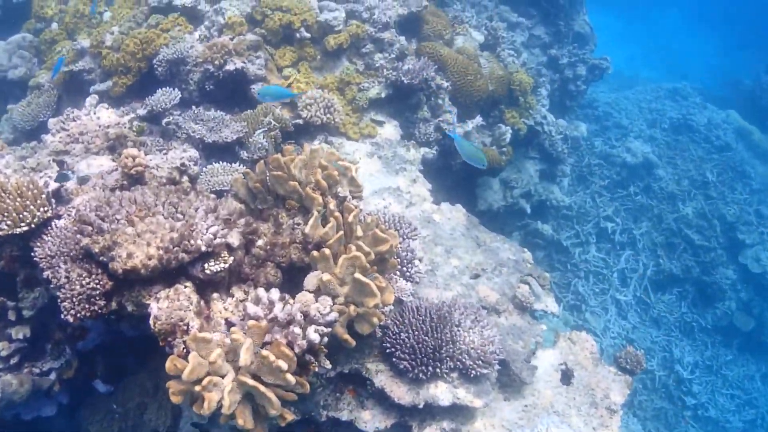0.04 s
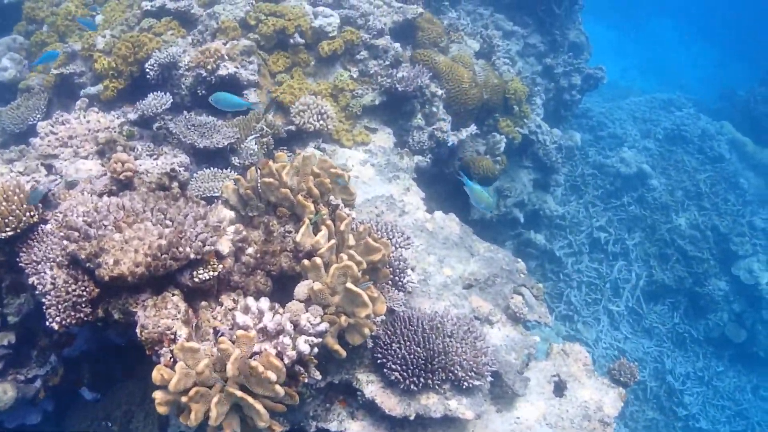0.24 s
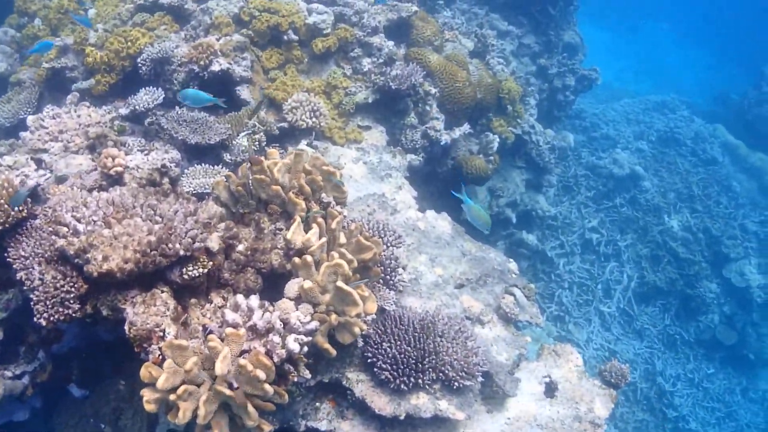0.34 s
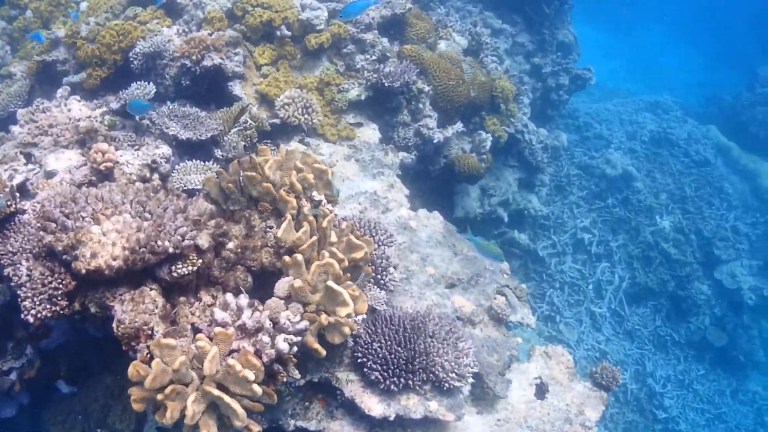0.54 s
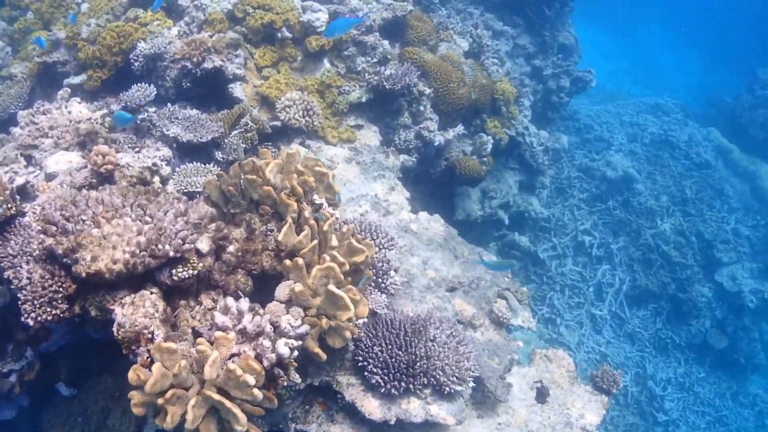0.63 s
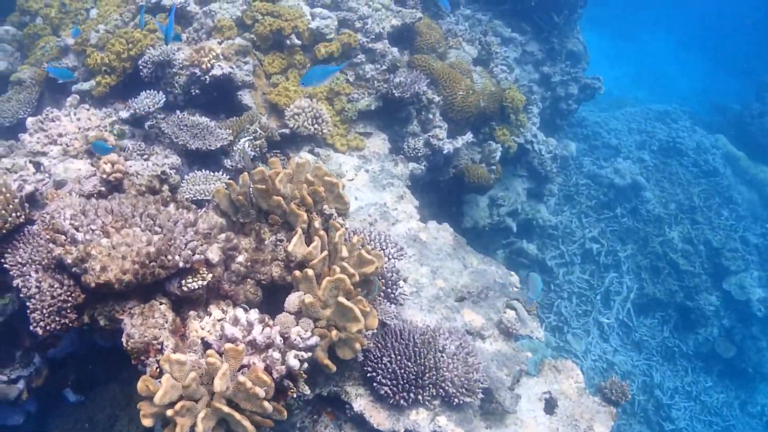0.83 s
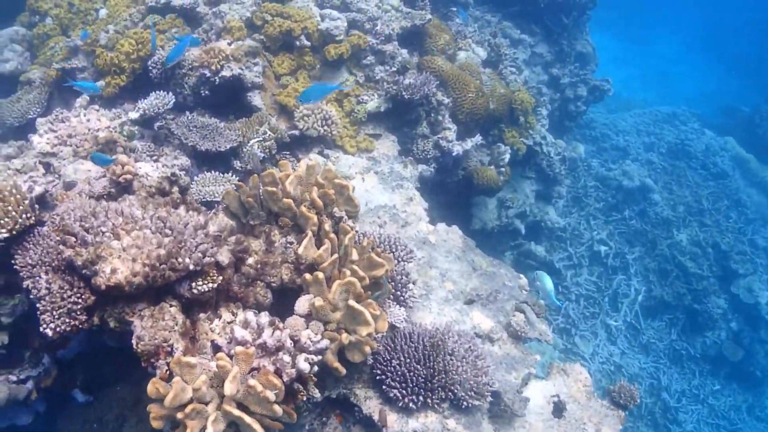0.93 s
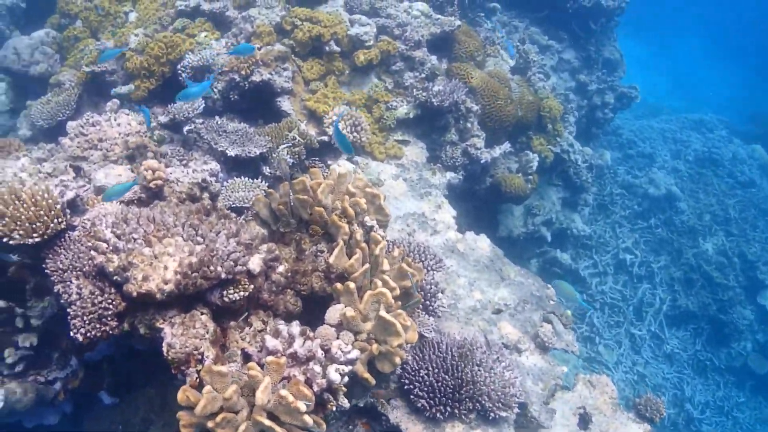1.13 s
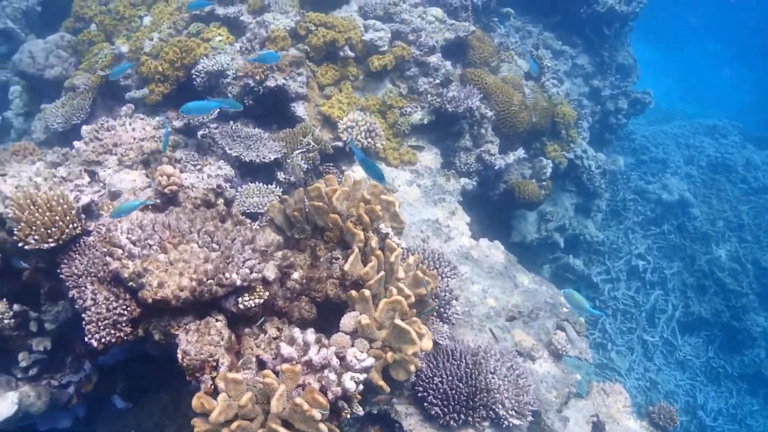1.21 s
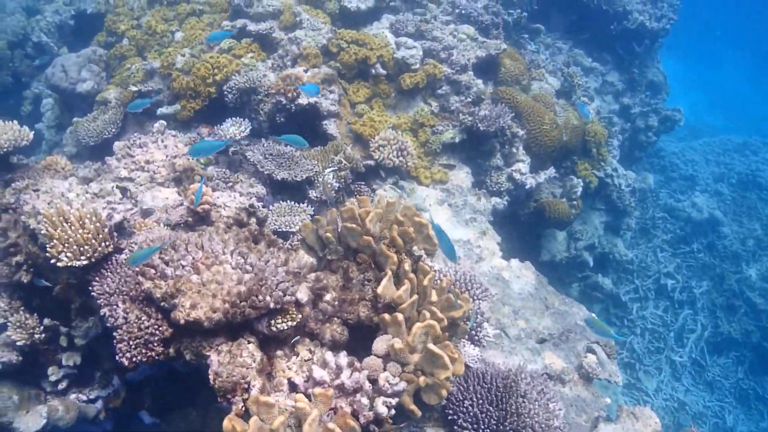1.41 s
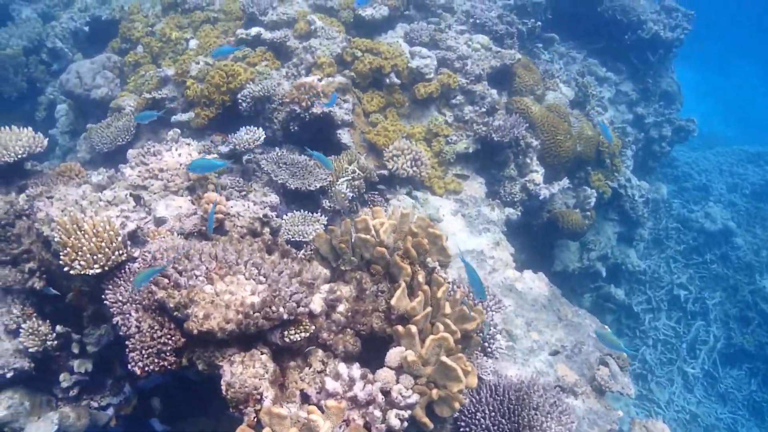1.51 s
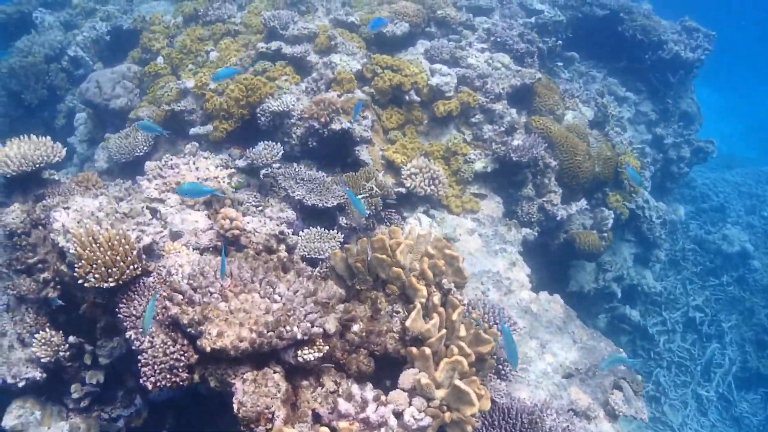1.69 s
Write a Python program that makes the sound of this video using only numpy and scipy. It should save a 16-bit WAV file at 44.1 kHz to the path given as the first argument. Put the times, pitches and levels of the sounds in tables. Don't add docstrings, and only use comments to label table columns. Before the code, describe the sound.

Water knocks and gurgles hollowly against a sealed underwater camera housing, with faint reef crackle behind.

```python
import sys
import numpy as np
from scipy import signal
from scipy.fft import rfft, irfft
from scipy.io import wavfile
from scipy.ndimage import uniform_filter1d

SR = 44100
rng = np.random.default_rng(int(sys.argv[2]) if len(sys.argv) > 2 else 0)


def bounce(signal):
    frames = np.transpose(np.atleast_2d(signal))
    limited = np.clip(frames, -1, 1)
    pcm = np.round(limited * 32767).astype(np.int16)
    wavfile.write(sys.argv[1], SR, pcm)


def gain_from_db(level_db):
    decades = np.asarray(level_db, float) / 20
    return 10 ** decades


N = 77175


def ring(hz, tau_s, sag=0., order=1):
    tau_s = max(tau_s, 1e-4)
    t = np.arange(int(14 * tau_s * SR)) / SR
    envelope = (t / tau_s / order) ** order * np.exp(order - t / tau_s)
    return envelope * np.sin(2 * np.pi * hz * (t - sag * t ** 2 / (8 * tau_s)))


def add(out, wave, start_s):
    i = max(int(start_s * SR), 0)
    out[:, i:i + wave.shape[-1]] += wave[..., :N - i]


def follow(points):
    return np.interp(np.arange(N) / SR, *np.array(points).T)


def colour(x, points, extra=0.):
    hz = np.fft.rfftfreq(N, 1 / SR) + 1
    curve_hz, curve_db = np.array(points).T
    gain = gain_from_db(np.interp(np.log(hz), np.log(curve_hz), curve_db)) + extra
    return irfft(rfft(x) * gain, N)


def unit(x):
    return x / np.sqrt(np.mean(x ** 2))


def walk(rate_hz):
    hold = int(SR / rate_hz)
    steps = np.repeat(rng.standard_normal(N // hold + 1), hold)
    return 1.45 * uniform_filter1d(uniform_filter1d(steps, hold), hold)[:N]


def dust(rate_hz, scatter_db):
    when, sign, size = rng.random((3, N))
    return (when < rate_hz / SR) * np.sign(sign - .5) * gain_from_db(-scatter_db * np.log(size + 1e-4))


# (time [s], peak [dB], pitch [Hz], ring time constant [s])
KNOCKS = [(.004, -25.5, 358, 0.0028), (0.041, -21.5, 384.8, 0.0034), (0.076, -25.5, 370, 0.0031),
          (0.141, -27.5, 375, .004), (0.168, -23.5, 370, 0.0048), (0.202, -19, 392, 0.0031),
          (0.233, -19, 362, 0.0016), (0.251, -16, 374, 0.0034), (.272, -18.5, 388, 0.0014),
          (0.283, -19, 336, 0.0031), (0.338, -20.5, 338.6, 0.002), (0.353, -18.5, 350, 0.0022),
          (0.377, -24, 352, 0.006), (.394, -23.5, 364.4, 0.0042), (0.407, -18, 339, 0.002),
          (.444, -20.5, 364, 0.0018), (0.48, -19.5, 351, 0.002), (0.505, -18.5, 419.6, 0.0037),
          (0.539, -10.5, 375, 0.002), (0.55, -22.5, 394, 0.0037), (0.59, 0, 389, 0.0017),
          (.652, -24.5, 346, 0.0013), (.68, -30, 433, 0.0037), (0.752, -19.5, 377, 0.0019),
          (0.795, -29, 352, 0.0013), (.807, -29, 375, 0.005), (0.834, -26, 395, 0.0039),
          (0.856, -22, 426, 0.0018), (0.877, -25.5, 347, 0.0049), (0.914, -24, 351, 0.0037),
          (0.959, -25, 377, 0.0035), (0.998, -23, 353, 0.002), (1.06, -25.5, 353, 0.0012),
          (1.083, -29.5, 347, 0.0047), (1.148, -21.5, 409.5, 0.0047), (1.179, -18, 405, 0.0024),
          (1.246, -22, 355, 0.0019), (1.258, -25.5, 362, 0.0018), (1.274, -23, 351, 0.0037),
          (1.295, -26.5, 340, 0.0046), (1.34, -36, 344, 0.0028), (1.412, -27, 363, 0.0045),
          (1.47, -14, 324, 0.0019), (1.501, -28, 383, 0.0074), (1.53, -30.5, 385, 0.0013),
          (1.609, -27, 353, 0.0023), (1.633, -29, 332, 0.0018), (1.687, -24, 378, 0.0025),
          (1.701, -27, 362, 0.0021), (1.73, -28, 348, 0.0027)]
# (time [s], level [dB])
FLOW = [
    (0.0, -38.5),
    (0.326, -35.5),
    (.7, -37),
    (1.238, -40.5),
    (1.75, -36),
]
# (frequency [Hz], gain [dB])
SHELL_SKIRTS = [(60, -60.5), (150, -20), (260, -16), (550, -19.5), (850, -17.5), (1200, -39), (2500, -40),
                (6500, -96)]


def shell():
    hz = np.fft.rfftfreq(N, 1 / SR) + 1
    mode_hz, width_hz, peak_db = 364, 93, -1.5
    mode = gain_from_db(peak_db) / (1 + ((hz - mode_hz) / (width_hz / 2)) ** 2)
    push = dust(900, scatter_db=2) * gain_from_db(1.0 * walk(23.5))
    left = (unit(colour(push, SHELL_SKIRTS, mode)) * gain_from_db(follow(FLOW) + 3))[None]
    upper_hz, upper_db, upper_s = 538.6, -11.5, 0.0016
    for s, db, pitch_hz, tau_s in KNOCKS:
        add(left, gain_from_db(db - 1.6) * ring(pitch_hz, tau_s, sag=0.032, order=3), s - .0016)
        add(left, gain_from_db(db + upper_db) * ring(upper_hz, upper_s, order=2), s)
    right_lag_s = .0001
    right = irfft(rfft(left[0]) * np.exp(-2j * np.pi * hz * right_lag_s), N)
    return np.array([left[0], right])


# (time [s], peak [dB], pitch [Hz], length [s])
THUMPS = [(.45, -48, 131, 0.0063), (0.625, -50, 75, 0.0045), (.7, -75, 85.5, 0.0034),
          (0.817, -55, 114, 0.007), (0.9, -47, 71, 0.0051), (1.03, -35.5, 123, 0.0042),
          (1.082, -31.5, 85, 0.0032), (1.143, -42.5, 75, 0.0057), (1.192, -34.5, 123, 0.0044),
          (1.222, -37.5, 107, 0.0048), (1.308, -37, 95, 0.0048), (1.339, -44, 75, 0.0055),
          (1.38, -49, 70, 0.0061), (1.6, -46.5, 176, 0.0082), (1.672, -43, 134, 0.004)]
# (time [s], peak [dB], pitch [Hz], ring time constant [s], left share
# [dB])
PINGS = [(.118, -28.5, 375, 0.0055, 1.5), (.282, -22, 577, 0.0016, -0.5), (0.396, -57, 1640, .0008, 18.5),
         (0.447, -33.5, 237, 0.003, 1), (.483, -25.5, 1090, 0.0013, -18), (0.498, -27.5, 1170, 0.0015, -35),
         (0.521, -26.5, 1292, 0.002, -24), (.529, -16.5, 387, .004, 1.5), (.541, -17.5, 588, 0.0011, 0.5),
         (0.541, -27, 1080, 0.00072, -15), (.655, -39, 149, 0.0049, -5.5),
         (0.721, -33.5, 1180, 0.0015, -24), (0.753, -24, 594, 0.0017, 0), (.752, -30.5, 1080, 0.0012, -17),
         (.855, -27.5, 1306, 0.0027, -29), (1.0, -33, 776, 0.0028, -10), (1.285, -34.5, 870, 0.0029, -17),
         (1.203, -35.5, 1630, .001, -10), (1.325, -30.5, 576, 0.0022, -1), (1.469, -26, 190, 0.003, -0.5),
         (1.529, -33, 1080, 0.0031, -20), (1.556, -36.5, 956, 0.0014, -17), (1.59, -31, 860, 0.0024, -17)]
# (time [s], level [dB])
EDDY = [(0, -4), (.13, 0), (.45, 2.5), (.65, 4), (.8, -1), (1.05, -5.5), (1.25, 1), (1.35, -3), (1.5, 1.5),
        (1.6, -0.5), (1.75, 2)]
# (frequency [Hz], gain [dB])
PORT_CURVE = [(60, -31), (200, -24), (600, -22), (1000, -19), (1400, -26.5), (1800, -35.5), (2300, -63),
              (6500, -89.5)]


def port():
    out = np.zeros((2, N))
    rub = dust(1500, scatter_db=1.15) * gain_from_db(3 * walk(17.98))
    out[1] = unit(colour(rub, PORT_CURVE)) * gain_from_db(-39 + follow(EDDY))
    thump_side_db = np.array([[-28], [6]])
    for s, db, pitch_hz, tau_s in THUMPS:
        add(out, gain_from_db(db + thump_side_db) * ring(pitch_hz, tau_s, order=2), s - tau_s)
    for s, db, pitch_hz, tau_s, left_db in PINGS:
        ping_side_db = np.array([[left_db], [0]])
        add(out, gain_from_db(db + ping_side_db) * ring(pitch_hz, tau_s, order=2), s - .001)
    return out


# (frequency [Hz], left [dB], right [dB], ring time constant [s])
SNAP_MODES = [(1682, -15, -6, 0.0014), (2759.4, -11.5, 2.5, 0.00032), (3129, -4.5, 3.5, 0.00038),
              (3453, -15.5, -1.5, 0.00042), (4670, -1, -1, 0.00025), (5400, -8, -19, 0.00064),
              (5846, -16, -14, 0.00041), (7340, -23, -10.5, 0.000062)]
# (frequency [Hz], level [dB], ring time constant [s])
MEMBRANE = [(1080, 3, 0.00085), (1323, 3, 0.00069), (1586, -8, 0.00046), (1920, -6.5, 0.00063),
            (2064, -9, 0.00028)]


def snap(bright_hz, membrane_db, chance):
    out = np.zeros((2, 4096))
    focus_db_per_octave, jitter, patchy_db, spread_cycles = 6.5, .012, 1.2, 2.5
    for k, (hz, left_db, right_db, tau_s) in enumerate(SNAP_MODES):
        lean_db = -focus_db_per_octave * abs(np.log2(hz / bright_hz)) + patchy_db * chance[-1 - k]
        wave = ring(hz * (1 + jitter * chance[k]), tau_s, order=2)
        i = int(spread_cycles * SR / hz)
        out[0, i:i + len(wave)] += gain_from_db(left_db + lean_db) * wave
        i += int(SR / hz / 4)
        out[1, i:i + len(wave)] += gain_from_db(right_db + lean_db) * wave
    for hz, db, tau_s in MEMBRANE:
        wave = ring(hz, tau_s)
        i = int(spread_cycles * SR / hz)
        out[1, i:i + len(wave)] += gain_from_db(db + membrane_db) * wave
    t = np.arange(len(chance)) / SR
    tail_s, tail_db, burst_s, burst_db = .005, -24, .0006, -17
    echoes = chance * np.exp(-t / tail_s) * gain_from_db(tail_db) / 4
    echoes += chance * np.exp(-t / burst_s) * gain_from_db(burst_db)
    echoes[0] = 1
    return signal.fftconvolve(out, echoes[None])


# (time [s], peak [dB], brightest [Hz], membrane share [dB])
SNAPS = [(0.162, -47.5, 4530, 9), (0.1817, -54, 2880, 4), (0.1882, -41.5, 2500, 2.5),
         (0.217, -41.5, 3300, -18), (0.2891, -50, 2850, 15.5), (0.3287, -40.5, 4760, -3),
         (0.3614, -36, 4700, -6), (0.385, -48, 4800, -4), (0.41, -37.5, 4200, -5), (0.4256, -50, 2920, 14),
         (0.4875, -35, 5400, 5), (0.508, -25, 2850, -15), (0.5487, -39, 2880, 4.5), (0.5913, -43, 2540, -3),
         (0.601, -38, 4050, -15), (0.619, -50, 2700, -3), (0.6569, -22, 2530, 6.5), (0.7007, -49, 3200, -3),
         (0.719, -36.5, 4670, -16), (0.758, -40, 3050, -8), (0.8533, -44.5, 5200, -3),
         (0.9176, -46, 3010, -8), (0.9976, -40, 2970, -13), (1.0257, -33.5, 4200, -23),
         (1.065, -37, 4470, -4), (1.0914, -41, 4670, -23), (1.2027, -35, 2700, -6),
         (1.2318, -40.5, 4720, -20), (1.247, -45, 3000, -3), (1.261, -31, 3220, -4.5),
         (1.35, -47, 3540, -1), (1.386, -56, 4640, -8), (1.4168, -58, 4930, -8), (1.432, -44, 3090, -8),
         (1.4581, -29, 3520, -24), (1.566, -46, 3308, 0), (1.5746, -42, 3050, -15),
         (1.6078, -47, 3060, -16), (1.6474, -54, 2890, -5), (1.6766, -38, 4630, -8), (1.706, -36, 4700, -9)]
# (brightest [Hz], level [dB], membrane share [dB])
CRACKLE = [
    (3250, -57, -2),
    (5050, -61, -14),
]


def shrimp():
    out = np.zeros((2, N))
    chance = rng.standard_normal((len(SNAPS), 800))
    for (s, db, bright_hz, membrane_db), c in zip(SNAPS, chance):
        add(out, gain_from_db(db + 0.5) * snap(bright_hz, membrane_db, c), s - .0006)
    for bright_hz, db, membrane_db in CRACKLE:
        shared, left, right = (dust(700, scatter_db=2.6) for _ in range(3))
        far = shared + 3.0 * np.array([left, right])
        far = far * gain_from_db(1.5 * walk(30)) * settle()
        body = snap(bright_hz, membrane_db, np.zeros(800))
        out += gain_from_db(db) * unit(signal.fftconvolve(far, body, axes=1)[:, :N])
    return out


# (time [s], peak [dB])
TICKS = [
    (0.3614, -46),
    (0.384, -44),
    (0.4086, -44),
    (0.4862, -45),
    (0.5934, -54),
    (0.6564, -56),
    (0.7194, -47),
    (1.027, -45),
    (1.5664, -42.5),
]


def ticks():
    out = np.zeros((2, N))
    t = np.arange(256) / SR
    for s, db in TICKS:
        add(out, gain_from_db(db + 4) * rng.standard_normal((2, 256)) * np.exp(-t / .0006), s)
    return signal.sosfilt(signal.butter(4, 7000, "high", fs=SR, output="sos"), out)


# (time [s], gain [dB])
GAIN = [
    (0, -3),
    (.1, -1.5),
    (.3, 1.5),
    (.55, 1.5),
    (.7, 1),
    (1.75, 3),
]


def settle():
    return gain_from_db(follow(GAIN))


# (frequency [Hz], level [dB])
HISS = [(1000, -11), (5500, -2.5), (6600, -17.5), (8000, -10.5), (10000, -5), (12500, -3.5), (15500, -6)]


def hiss():
    noise = np.array([colour(rng.standard_normal(N), HISS) for _ in range(2)])
    return gain_from_db(-60) * unit(noise) * settle()


def scene():
    return shell() + port() + shrimp() + ticks()


def band_limit(x):
    return signal.sosfilt(signal.butter(12, 15700, fs=SR, output="sos"), x)


def record(dry):
    x = dry + hiss()
    x = signal.sosfilt(signal.butter(2, 60, "high", fs=SR, output="sos"), x)
    x = signal.sosfilt(signal.ellip(10, .2, 60, 15850, fs=SR, output="sos"), x)
    ceiling, offset = 1.6, -0.0011
    return band_limit(ceiling * np.tanh(x / ceiling) + offset)


dry = scene()
out = record(dry)
bounce(out)
```